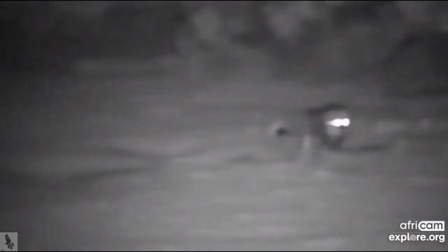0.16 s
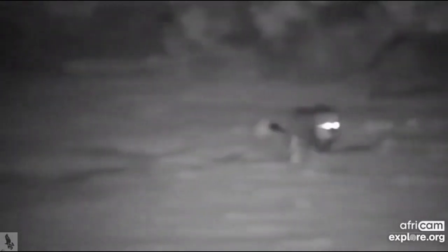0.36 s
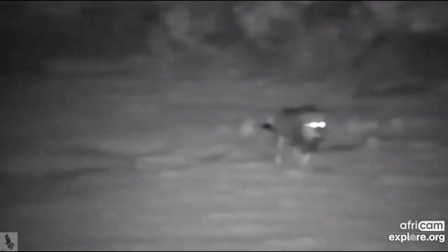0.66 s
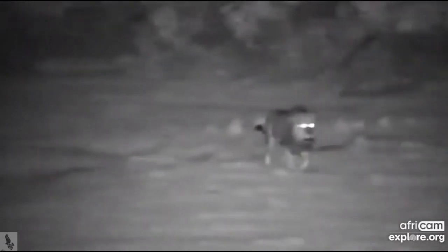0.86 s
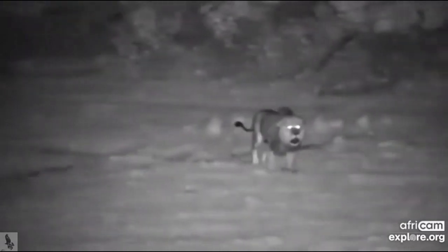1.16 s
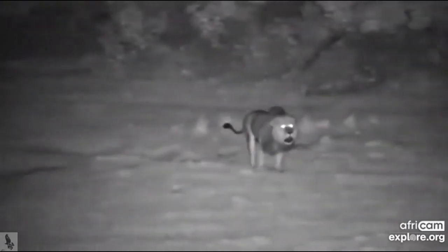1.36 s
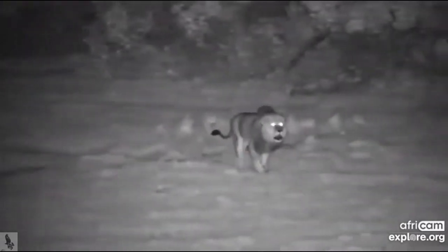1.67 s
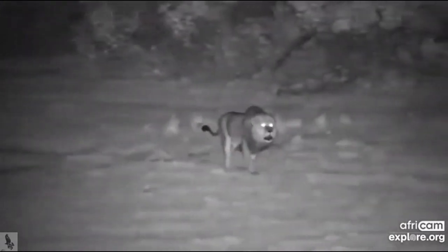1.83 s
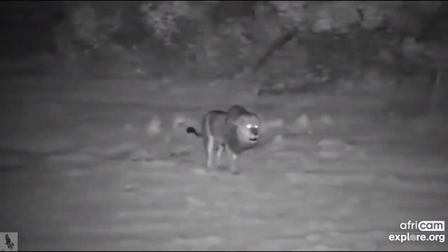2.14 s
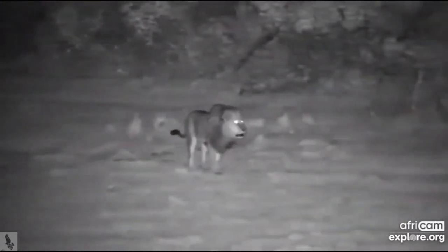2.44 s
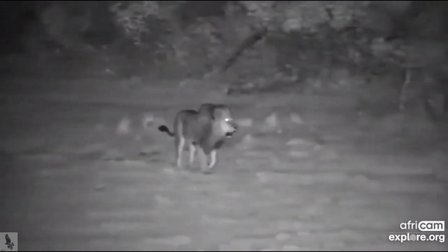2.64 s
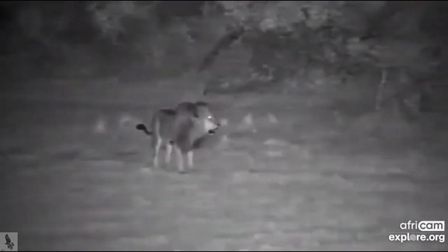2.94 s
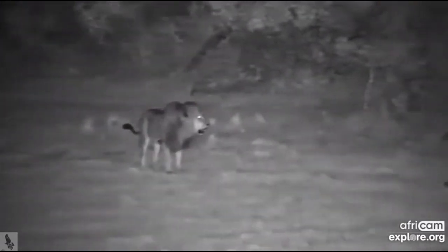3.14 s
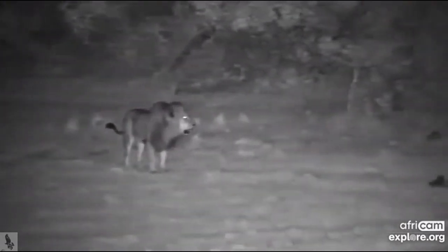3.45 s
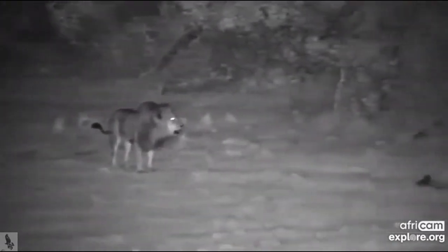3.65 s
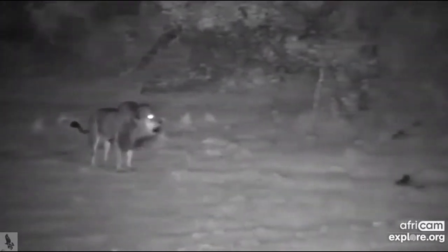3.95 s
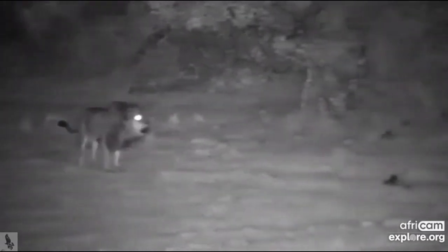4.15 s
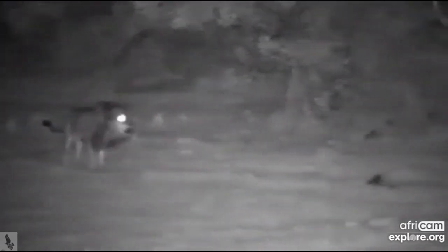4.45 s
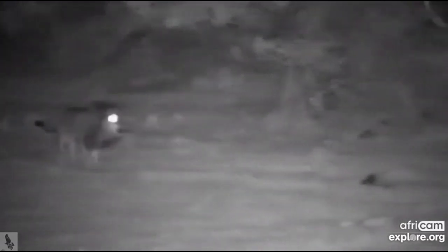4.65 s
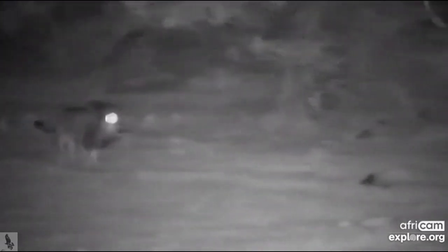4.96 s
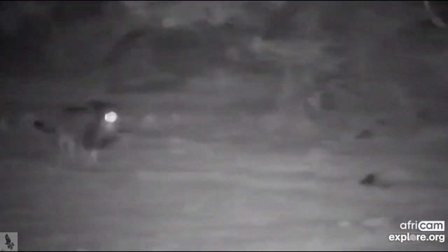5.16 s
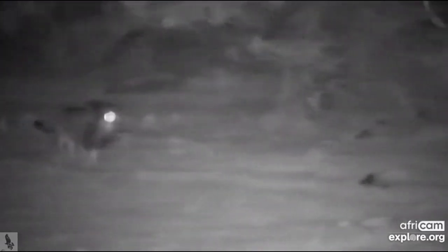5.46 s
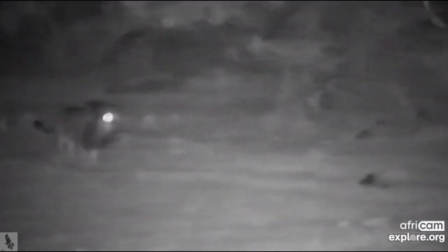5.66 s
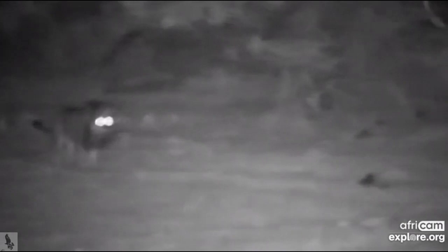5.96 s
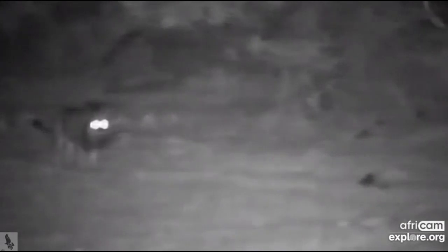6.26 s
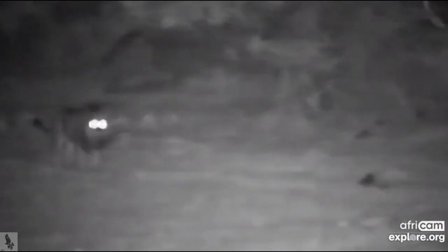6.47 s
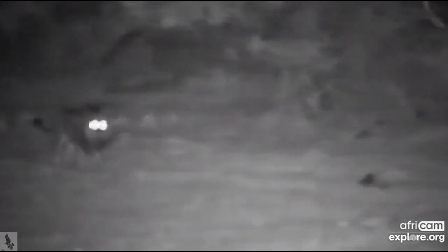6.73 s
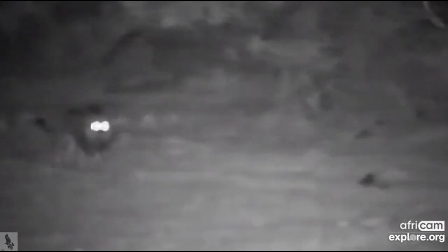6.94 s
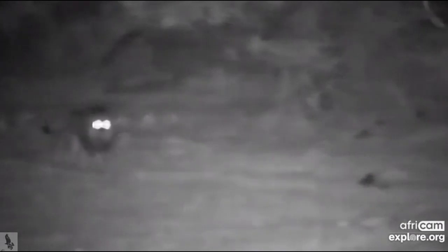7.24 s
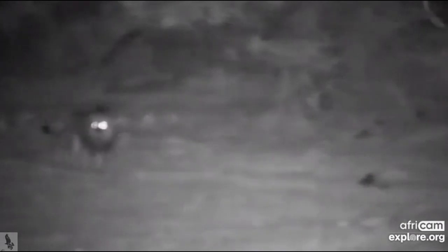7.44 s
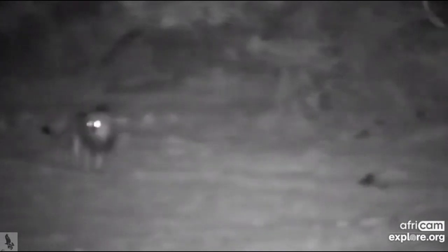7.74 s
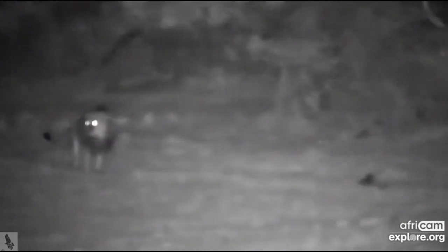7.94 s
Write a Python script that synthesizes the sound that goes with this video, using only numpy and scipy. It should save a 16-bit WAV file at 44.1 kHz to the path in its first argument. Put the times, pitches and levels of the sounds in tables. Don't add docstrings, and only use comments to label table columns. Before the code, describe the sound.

Open bush at night, heard from a fixed outdoor microphone. The fading echo of an earlier roar hangs first, then a lion some distance away gives three roars, each rising as a moan, dropping in pitch and roughening into a growl, with long echoes from far trees. Small frogs and paired cricket chirps surround it, with brief bird notes, faint bat cries, mains hum and soft hiss.

```python
import sys
import numpy as np
from scipy import signal
from scipy.fft import rfft, irfft
from scipy.io import wavfile
from scipy.ndimage import uniform_filter1d

SR = 44100
rng = np.random.default_rng(int(sys.argv[2]) if len(sys.argv) > 2 else 0)


def natural_amplitude(level_db):
    exponent = np.asarray(level_db, float) / 20
    return 10 ** exponent


def inscribe(sig):
    pcm = np.round(np.clip(np.atleast_2d(sig).T, -1, 1) * 32767)
    wavfile.write(sys.argv[1], SR, pcm.astype(np.int16))


N = 357210

# time in seconds, pitch in Hz, level of the chest tone in dB.
ROAR_PITCH = [
    [(1.31, 118, -61), (1.39, 149.6, -36.5), (1.46, 182.5, -37), (1.51, 191.8, -40.5), (1.66, 198.9, -35.5),
     (1.815, 212.5, -38), (1.87, 166.2, -28.5), (2.19, 170.8, -29.5), (2.3, 115.4, -57.5)],
    [(4.04, 118.2, -60), (4.15, 162.4, -34), (4.266, 208.1, -32.5), (4.574, 225.6, -46.5),
     (4.61, 197, -39.5), (4.714, 169.1, -28), (4.88, 157.3, -30.5), (4.962, 180.8, -37), (5.22, 106.5, -61)],
    [(6.6, 118.7, -54), (6.66, 137, -36.5), (6.754, 159.9, -34.5), (6.822, 186.8, -39), (6.994, 189.7, -38),
     (7.062, 161.8, -32), (7.25, 155.9, -28.5), (7.43, 151.2, -34), (7.62, 115, -57.5)],
]
# time in seconds, effort in dB, mouth opening 0 to 1.
ROAR_EFFORT = [
    [(1.29, -53, 0.4), (1.34, -31.5, .6), (1.49, -27.5, 0.5), (1.53, -20, 0.15), (1.8, -17.5, 0.46),
     (1.93, -23.5, 0.79), (2.02, -18, 0.68), (2.3, -26.5, 0.71), (2.53, -47.5, 0.6)],
    [(4.036, -50, 0.47), (4.08, -31.5, 0.65), (4.2, -26, 0.47), (4.27, -22.5, .5), (4.55, -23, 0.64),
     (4.64, -19.5, 0.44), (4.74, -21, 0.43), (5.05, -23.5, 0.62), (5.27, -53, 0.72)],
    [(6.552, -43.5, 0), (6.63, -28.5, 0.85), (6.78, -27, 0.56), (6.84, -22, 0.57), (7.14, -24.5, 0.53),
     (7.235, -15, 0.86), (7.29, -21.5, 0.63), (7.55, -26.5, 0.86), (7.8, -55, 0.61)],
]
# crack in seconds, roughness after it 0 to 1, start of growl in seconds.
CRACKS = [
    (1.68, .58, 2.09),
    (4.57, .86, 4.9),
    (6.79, .7, 7.33),
]
# start in seconds, end in seconds, roughness 0 to 1.
CLEAR_SPELLS = [(1.5, 1.675, .16), (1.92, 2.05, .4), (4.265, 4.57, .05), (7.1, 7.3, .3)]
# time in seconds, size in dB.
JOLTS = [(2.209, 2), (2.297, 7.5), (2.375, 9.5), (2.433, 7.5), (4.083, 2), (5.008, 0), (6.635, 0.5),
         (7.433, 2), (7.642, 1), (7.723, -2)]
# centre in Hz, width in Hz, level in dB.
CAVITIES = [
    [(398, 75, 0)],
    [(632, 85, 0)],
    [(925, 100, 0), (1100, 115, -9), (1310, 115, -8)],
    [(1750, 180, -2), (1990, 200, -5), (2345, 260, -6), (2820, 400, -7), (3400, 500, -8), (4100, 600, -22),
     (4950, 700, -13), (6600, 900, -28)],
]
# dB with the mouth shut, dB with it wide open,
# gain in dB when a partial sits on it, gain in dB when rough, gain in dB by the roar's end.
GROUP_LEVELS = [
    (0.5, -11.5, 5.5, 0.11, -2),
    (-2.5, -6.5, 5, .1, -3.9),
    (-9, 1, 3, 1.52, -1.25),
    (-37, -26, 1.1, 2.7, 14),
]
# start in seconds, end in seconds, dB over the upper resonances,
# first Hz, last Hz.
TEETH_PASSAGE = [
    (1.48, 1.9, -2, 1800, 1950),
    (4.17, 4.63, 7, 2320, 2410),
    (6.88, 7.52, -4, 2850, 3550),
]
# delay in seconds, level in dB.
FAR_ECHO = [(0.0, -1.5), (.15, 18), (.4, -6.5), (.7, -3), (1.0, -7.5), (1.5, -20), (2.2, -17.5),
            (3.2, -22.5)]
# frequency in Hz, level in dB.
FAR_COLOUR = [(80, -11.5), (200, -3), (400, -3.5), (700, -6.5), (1300, -5), (1800, 0.5), (3000, -41),
              (8000, -57.5)]
# first chirp in seconds, last chirp in seconds, level in dB, middle Hz.
FROG_BOUTS = [(0.083, 0.364, -64.5, 2880), (0.446, .679, -69, 2770), (.853, 1.16, -67.5, 2950),
              (1.252, 1.468, -69, 2780), (0.026, .225, -70, 2760), (.61, .723, -71, 2830),
              (1.123, 1.123, -68, 2800), (2.585, 4, -65, 2760), (2.728, 3.6, -65.5, 2910),
              (3.149, 3.54, -65.5, 2800), (3.428, 3.6, -61.5, 2860), (3.932, 4.08, -63, 2790),
              (3.569, 3.8, -66.5, 2800), (5.298, 5.394, -63, 2850), (5.598, 6.018, -63, 2790),
              (5.953, 6.093, -68, 2820), (6.165, 6.454, -65, 2930), (6.227, 6.298, -66, 2750),
              (5.639, 5.85, -69, 2830), (6.42, 6.52, -71, 2750), (6.05, 6.13, -78, 2800),
              (7.794, 8.096, -71, 2690)]
# first chirp in seconds, level in dB.
CRICKETS = [(2.559, -66), (2.779, -67), (3.026, -66), (3.834, -67), (4.051, -64), (5.353, -65),
            (5.605, -65), (5.841, -67), (6.105, -68), (6.237, -68.5), (6.501, -68), (7.857, -69),
            (8.034, -71)]
# middle in seconds, level in dB, length in seconds.
BIRD_HOOKS = [(.905, -45, .07), (1.335, -47, .085), (6.63, -47, .06)]
# first, middle and last Hz.
HOOK_HZ = (1520, 1770, 1610)
TRILL_TIMES = [7.548, 7.663, 7.742, 7.82, 7.888]
# level in dB, length in seconds, first, middle and last Hz.
TRILL_NOTE = (-50, .045, 1600, 1750, 1600)
# middle in seconds, level in dB, length in seconds, first Hz, last Hz.
BIRD_GLIDES = [
    (1.11, -64, .3, 1050, 1380),
    (.695, -62, .04, 2200, 2000),
]
# middle in seconds, level in dB, first Hz.
BAT_HOOKS = [(.16, -67, 10500), (1.47, -65, 10150), (4.3, -65, 10300), (5.267, -60, 11100),
             (5.429, -64, 8987), (6.93, -65, 9820), (7.321, -72.5, 9900), (7.972, -63, 10410)]
# frequency in Hz, level in dB.
MAINS = [(50, -74), (150, -65), (250, -70), (350, -91.5), (450, -70.5), (550, -72.5), (650, -71)]
# frequency in Hz, level in dB per Hz.
HISS_COLOUR = [(15, -36), (25, -17.5), (70, -22.5), (110, -16.5), (200, -21.5), (400, -11.5), (650, -11),
               (1300, -18.5), (2000, -20), (2850, -22), (3500, -23), (12000, -25.5), (20000, -24)]
# middle in seconds, lowest Hz hit, height in dB over the hiss
THIN_TREBLE = [(.234, 2200, -10), (1.553, 3600, 16), (1.581, 3800, 22), (1.65, 4000, 15.5), (1.914, 3500, 7),
               (2.01, 3800, 10), (2.364, 5200, 27), (2.41, 5200, 8), (2.911, 1700, 0), (2.952, 1700, 0.5),
               (4.214, 2600, 14), (4.653, 5500, 17), (4.684, 5500, 20), (4.734, 5500, 21), (5.147, 5400, 18),
               (5.198, 3800, 7), (5.25, 3800, 5), (5.402, 3200, -11), (5.492, 2200, 2.5), (5.607, 1800, 4),
               (5.68, 1800, 1), (6.888, 3500, 37), (6.958, 3500, 39), (7.167, 4000, 23), (7.227, 3800, 25.5),
               (7.549, 5400, 37), (7.582, 5300, 23), (7.686, 5500, 12), (7.713, 5500, 7), (8.09, 2500, 1)]


def lion():
    lead_s = 2
    lead = lead_s * SR
    dry = np.zeros(N + lead)
    for k, row in enumerate(zip(ROAR_PITCH, ROAR_EFFORT, CRACKS, TEETH_PASSAGE)):
        s, voice = roar(*row)
        add(dry, s + lead_s, voice)
        if k == 0:
            add(dry, s + lead_s - 2.62, natural_amplitude(0.5) * voice)
    return bush(dry)[lead:]


def roar(pitch, effort, crack, passage):
    s, *columns = np.transpose(effort)
    t = np.arange(s[0], s[-1], 1 / SR)
    n = len(t)
    effort_db, mouth = (np.interp(t, s, c) for c in columns)
    pitch_s, *columns = np.transpose(pitch)
    hz, chest_db = (np.interp(t, pitch_s, c) for c in columns)
    rough = roughness(t, *crack)
    spent = (t - s[0]) / (s[-1] - s[0])
    turns = np.cumsum(hz * (1 + 0.0066 * drift(n, 25))) / SR
    steady, slaps, puffs = folds(turns)

    chest_db = chest_db - 90 * np.maximum(t - pitch_s[-1], 0)
    chest = natural_amplitude(chest_db) * np.sqrt(2) * np.cos(2 * np.pi * turns)
    voice = chest * (1 + 0.27 * rough * drift(n, 40))
    flutter_db = uniform_filter1d(effort_db, 6000) - 31 + 16 * spent ** 4
    voice += natural_amplitude(flutter_db) * evened(resonate(slaps + puffs, 130, 230))

    jolt_db = sum(db * np.exp(-abs(t - at) / .025) * np.tanh((t - at) / .002) for at, db in JOLTS)
    for group, (shut_db, open_db, tuned_db, rough_db, late_db) in zip(CAVITIES, GROUP_LEVELS):
        over_db = shut_db + (open_db - shut_db) * mouth + rough_db * rough + late_db * spent ** 2.03
        over_db += tuned_db * (1 - rough ** 3) * np.cos(2 * np.pi * group[0][0] / hz)
        ring = throat(group, rough, steady, slaps, puffs)
        voice += natural_amplitude(effort_db + over_db + jolt_db) * levelled(ring)
    voice += natural_amplitude(effort_db + over_db) * teeth(t, rough, steady, puffs, *passage)

    burst = np.exp(-((t - s[0] - .09) / .04) ** 2)
    voice += natural_amplitude(effort_db - 33.5) * burst * evened(resonate(puffs, 5300, 1400))
    return s[0], voice * signal.windows.tukey(n, .008)


def roughness(t, crack_s, cracked, growl_s):
    rough = np.select([t > growl_s, t > crack_s], [.97, cracked], .47)
    for start, stop, clear in CLEAR_SPELLS:
        rough[(t > start) & (t < stop)] = clear
    return uniform_filter1d(rough, round(.05 * SR))


def folds(turns):
    n = len(turns)
    steady = evened(sum(np.cos(2 * np.pi * k * turns) for k in range(2, 40)))
    loose = turns + .25 * drift(n, 70)
    closings = np.diff(np.floor(loose), prepend=0) != 0
    slaps = closings * natural_amplitude(2.35 * drift(n, 66))
    slaps = evened(slaps - slaps.mean())
    puffs = evened((0.55 + np.exp(-(loose % 1) / .4)) * rng.standard_normal(n))
    return steady, slaps, puffs


def throat(group, rough, steady, slaps, puffs):
    ring, n = 0, len(rough)
    for k, (f, width, db) in enumerate(group):
        broken = 1 - (1 - rough) ** max(f / 650, 1) ** 1.9
        chaos = evened(min(900 / f, 1) ** 2 * slaps + puffs)
        lumps = natural_amplitude(3.66 * broken * drift(n, 38))
        drive = np.sqrt(1 - broken ** 2) * steady + broken * chaos * lumps
        lift_db = 3.5 * rough * min(f, 3000) / 1000
        cavity_hz = f + .1 * min(f, 1000) * rough ** 4 * drift(n, 14)
        ring = ring + (-1) ** k * natural_amplitude(db + lift_db) * resonate(drive, cavity_hz, width)
    return ring


def teeth(t, rough, steady, puffs, start, stop, ring_db, first_hz, last_hz):
    ajar = np.clip(np.minimum(t - start, stop - t) / .08 + .5, 0, 1) ** 2
    breath = np.minimum(rough + .08, 1) ** (2300 / last_hz) ** 3
    hz = np.interp(t, [start, stop], [first_hz, last_hz])
    width = 170 * (1 + 30 * np.log(last_hz / 2400) ** 2)
    sound = resonate((1 - breath) * steady + breath * puffs, hz, width)
    return ajar * natural_amplitude(ring_db) * levelled(sound)


def bush(x):
    t = np.arange(round(3.2 * SR)) / SR
    far = rng.standard_normal(len(t)) * natural_amplitude(np.interp(t, *np.transpose(FAR_ECHO)))
    far = irfft(rfft(far) * natural_amplitude(read(FAR_COLOUR, np.fft.rfftfreq(len(t), 1 / SR))), len(t))
    near = rng.standard_normal(len(t)) * natural_amplitude(-60 * t / 0.16) * (t > .003)
    share = natural_amplitude(-5)
    tail = natural_amplitude(-28) * far / np.linalg.norm(far) + share * near / np.linalg.norm(near)
    return (x + signal.fftconvolve(x, tail)[:len(x)]) / np.sqrt(1 + share ** 2)


def bird():
    calls = whistles([row + HOOK_HZ for row in BIRD_HOOKS], late=2.0)
    calls += whistles([(s, *TRILL_NOTE) for s in TRILL_TIMES])
    calls += whistles([(s, db, length, a, (a + b) / 2, b) for s, db, length, a, b in BIRD_GLIDES])
    return calls + natural_amplitude(-22) * np.roll(calls, 5200)


def frogs():
    gap_s = .1
    rows = [(s, db, hz) for first, last, db, hz in FROG_BOUTS
            for s in np.linspace(first, last, round((last - first) / gap_s) + 1)]
    uneven = rng.uniform(-1, 1, (len(rows), 3)) * [0, 2, 40]
    return chirps(rows + uneven, .046, 320, 2.5)


def crickets():
    pairs = [(s + gap_s, db, 4130) for s, db in CRICKETS for gap_s in (0, .036)]
    return chirps(pairs, .03, 280, 2.5)


def bat():
    return whistles([(s, db, .036, hz, hz + 250, hz + 1200) for s, db, hz in BAT_HOOKS])


def chorus(count=190):
    s, size, pitch = rng.random((count, 3)).T
    rows = zip(.03 + s * (N / SR - .03), -70 - 6 * size, 2740 + 200 * pitch)
    return chirps(rows, .04, 300, 0.5)


def chirps(rows, length, fall_hz, lift_db):
    half = fall_hz / 2
    return whistles([(s, db + lift_db, length, hz + half, hz, hz - half) for s, db, hz in rows])


def whistles(rows, late=1):
    out = np.zeros(N)
    for s, db, length, *path_hz in rows:
        u = np.linspace(0, 1, round(length * SR))
        hz = np.polyval(np.polyfit([0, .5, 1], path_hz, 2), u ** late)
        tone = np.sin(2 * np.pi * np.cumsum(hz) / SR)
        add(out, s - length / 2, natural_amplitude(db) * np.sin(np.pi * u) ** .7 * tone)
    return out


def hum():
    t, out = np.arange(N) / SR, np.zeros(N)
    for hz, db in MAINS:
        level = natural_amplitude(db + 0.54 * drift(N, 2.5)) * np.sqrt(2)
        out += level * np.sin(2 * np.pi * (hz * t + rng.random()))
    return out


def hiss():
    frames, hz = N // 256 + 5, np.fft.rfftfreq(1024, 1 / SR)
    a, b, patches = rng.standard_normal((frames, 513, 3)).T
    patches = evened(uniform_filter1d(uniform_filter1d(patches, 12, 0), 10, 1))
    z = (a + 1j * b) * natural_amplitude(read(HISS_COLOUR, hz)[:, None] + 1.1 * patches)
    return natural_amplitude(-59.5) * evened(signal.istft(z, nperseg=1024, noverlap=768)[1][:N])


def evened(x):
    return x / np.sqrt(np.mean(x ** 2) + 1e-20)


def levelled(x, size=2600):
    power = uniform_filter1d(uniform_filter1d(x ** 2, size), size)
    return x / np.sqrt(abs(power) + 1e-12)


def read(points, hz):
    f, value = np.transpose(points)
    return np.interp(np.log(hz + 1), np.log(f + 1), value)


def add(mix, s, sound):
    part = mix[max(round(s * SR), 0):][:len(sound)]
    part += sound[:len(part)]


def drift(n, hz):
    return evened(signal.sosfilt(signal.butter(2, hz, fs=SR, output="sos"), rng.standard_normal(n)))


def resonate(x, hz, width):
    turn = np.exp(2j * np.pi * np.cumsum(hz * np.ones(len(x))) / SR)
    r = np.exp(-np.pi * width / SR)
    return 2 * (turn * signal.lfilter([(1 - r) ** 2], [1, -2 * r, r * r], x / turn)).real


def scene():
    callers = frogs() + crickets()
    callers += natural_amplitude(-12.5) * np.roll(callers, 700)
    return (lion() + callers + chorus() + bird() + bat() + hum() + hiss())[None]


def band_limit(x):
    return signal.sosfilt(signal.butter(12, 12220, fs=SR, output="sos"), x)


def record(dry):
    hz, t, z = signal.stft(dry[0], SR, nperseg=768, noverlap=640)
    floor = np.percentile(abs(z), 40, axis=1)[:, None]
    leak = natural_amplitude(-21)
    length_s, fade_s = .017, .024
    bar, gate = np.zeros(z.shape), np.zeros(N)
    for s, low_hz, over_db in THIN_TREBLE:
        hit = ((hz > low_hz) & (hz < 11700))[:, None]
        bar[:, abs(t - s) < .03] = floor * natural_amplitude(over_db) * hit
        window = signal.windows.tukey(round((length_s + fade_s) * SR), .8)
        add(gate, s - (length_s + fade_s) / 2, window)
    kept = z * np.where(abs(z) >= bar, 1, leak)
    thin = signal.istft(kept, SR, nperseg=768, noverlap=640)[1][:N]
    mix = dry[0] + np.minimum(gate, 1) * (thin - dry[0])
    return band_limit(mix[None])


dry = scene()
out = record(dry)
inscribe(out)
```